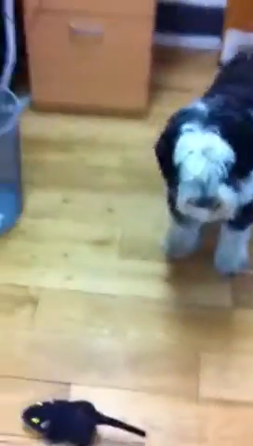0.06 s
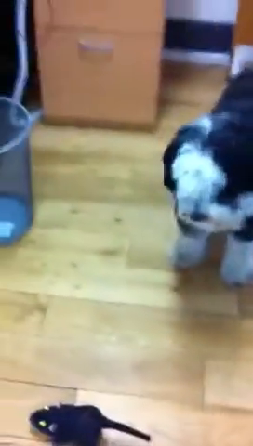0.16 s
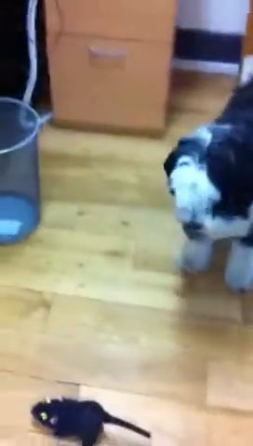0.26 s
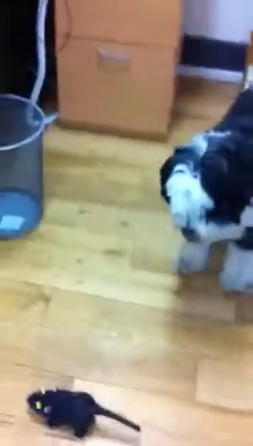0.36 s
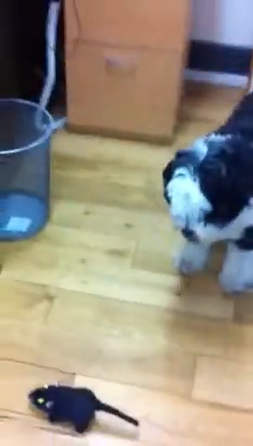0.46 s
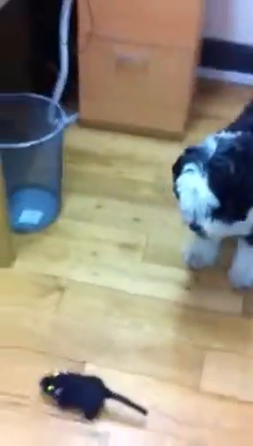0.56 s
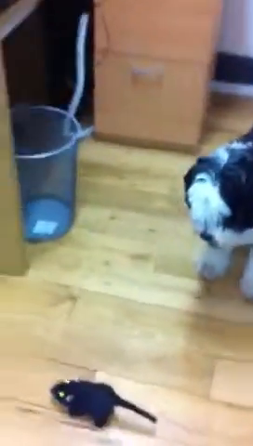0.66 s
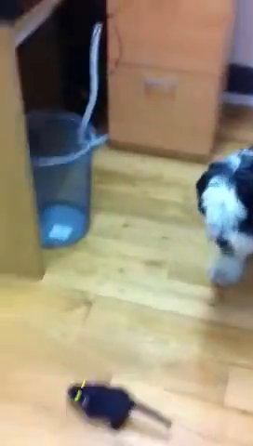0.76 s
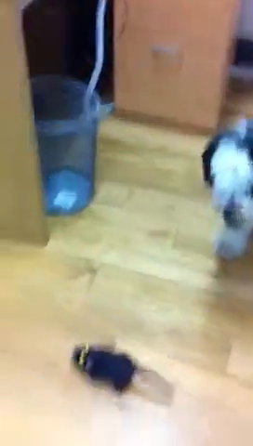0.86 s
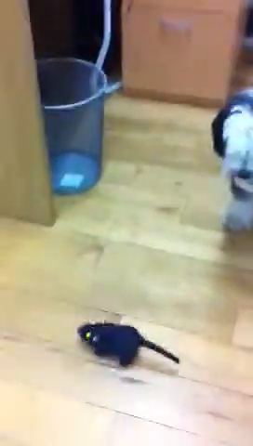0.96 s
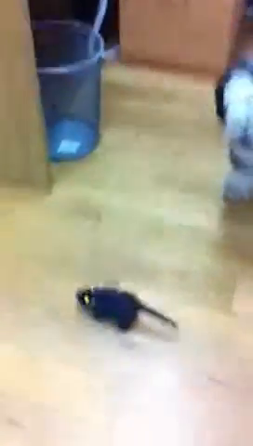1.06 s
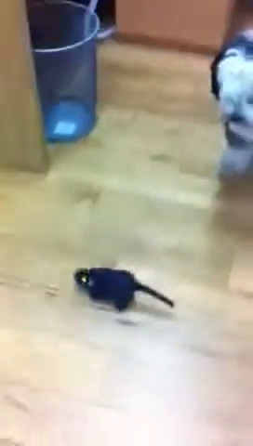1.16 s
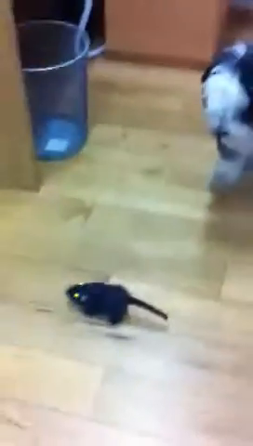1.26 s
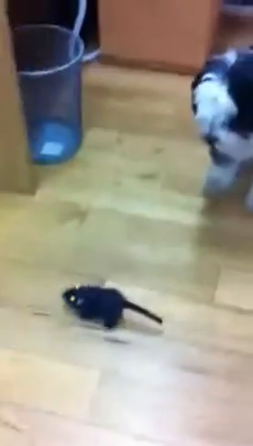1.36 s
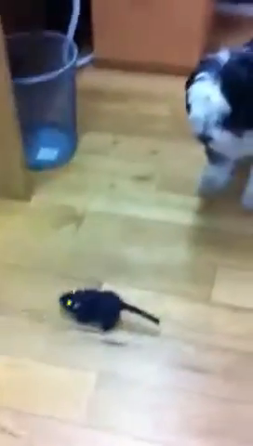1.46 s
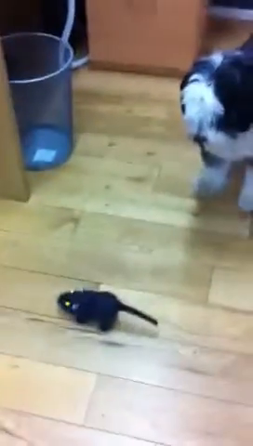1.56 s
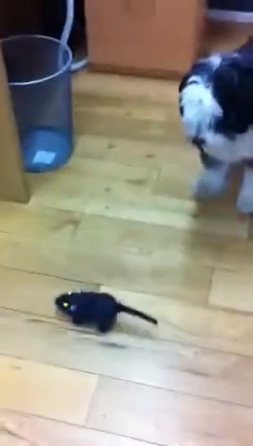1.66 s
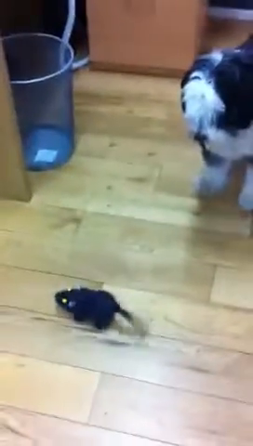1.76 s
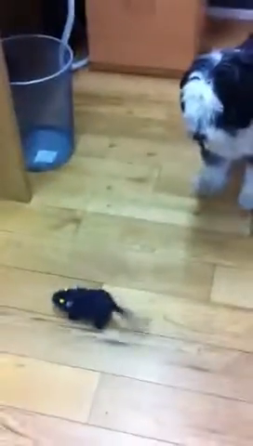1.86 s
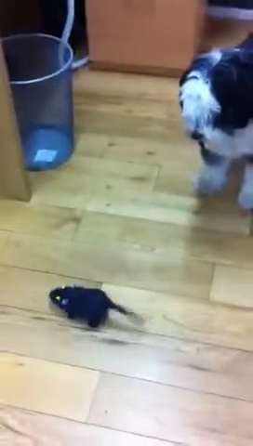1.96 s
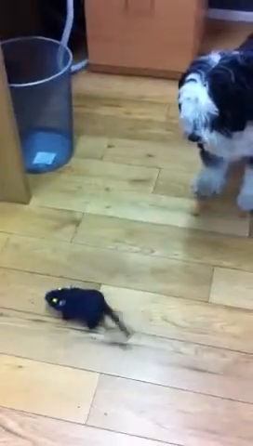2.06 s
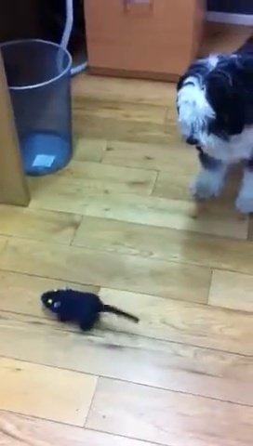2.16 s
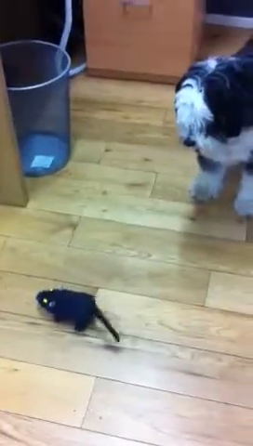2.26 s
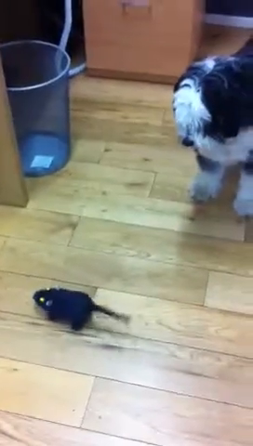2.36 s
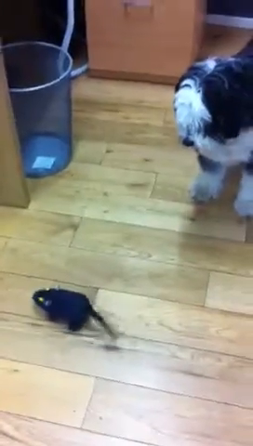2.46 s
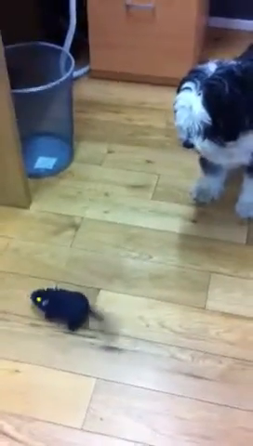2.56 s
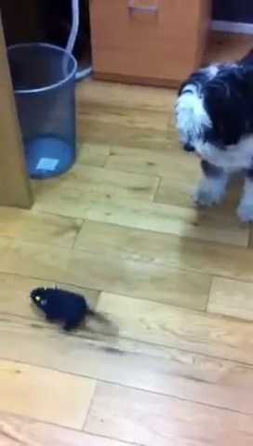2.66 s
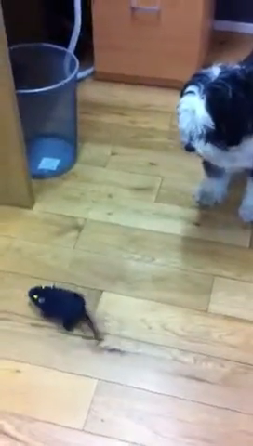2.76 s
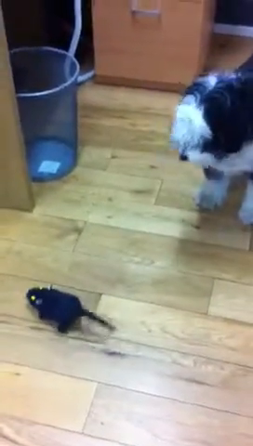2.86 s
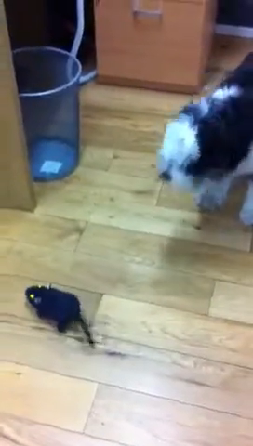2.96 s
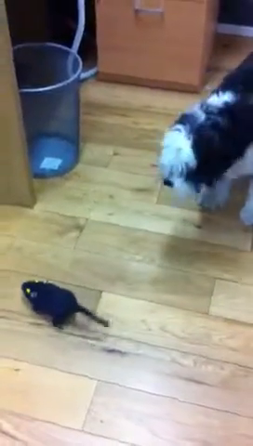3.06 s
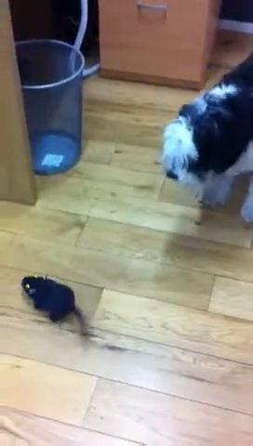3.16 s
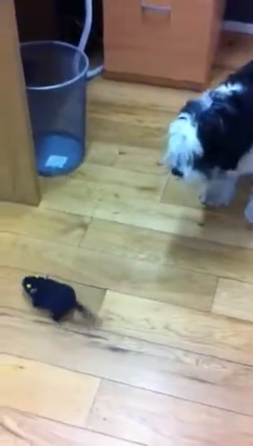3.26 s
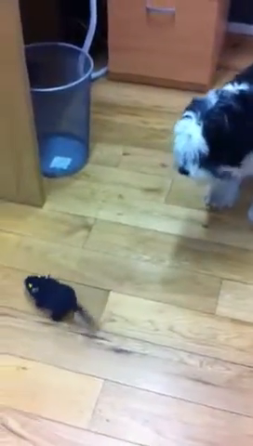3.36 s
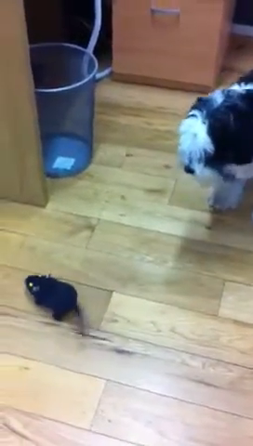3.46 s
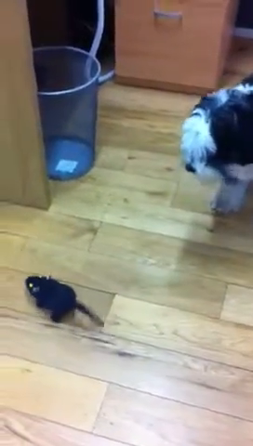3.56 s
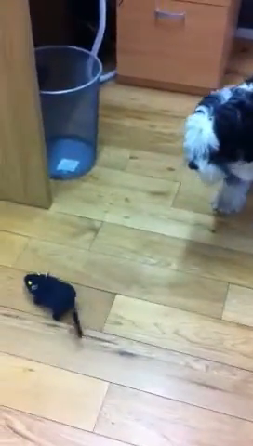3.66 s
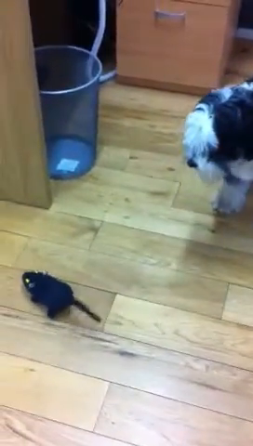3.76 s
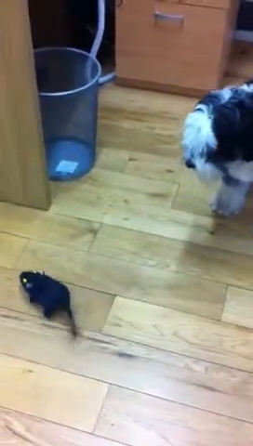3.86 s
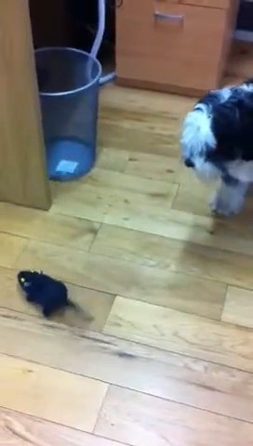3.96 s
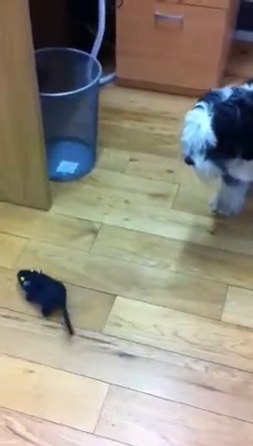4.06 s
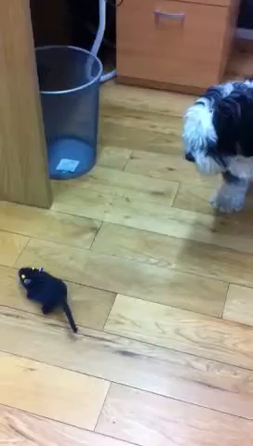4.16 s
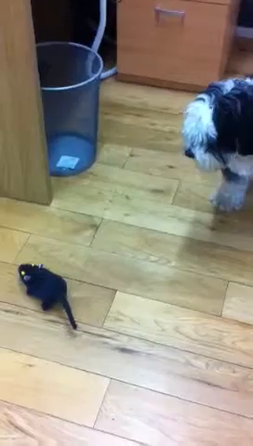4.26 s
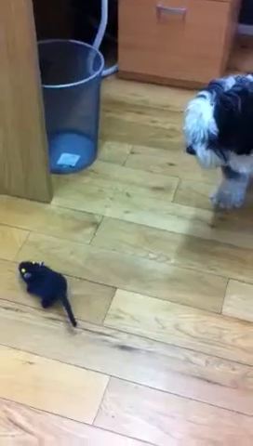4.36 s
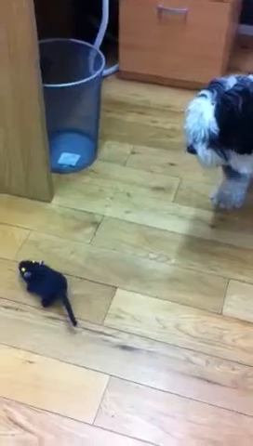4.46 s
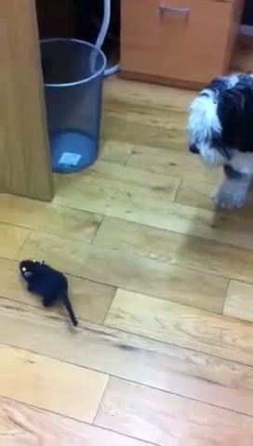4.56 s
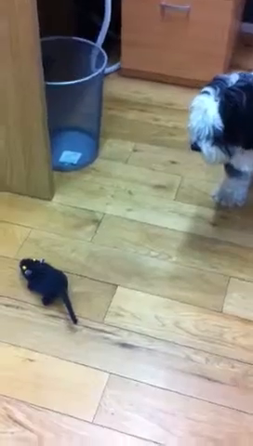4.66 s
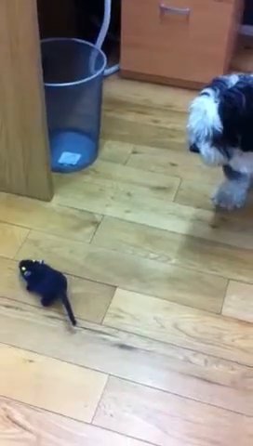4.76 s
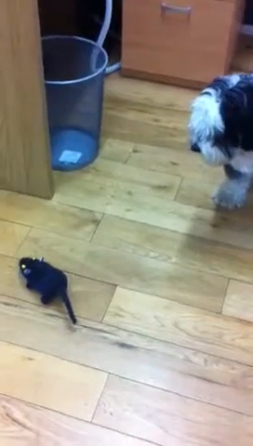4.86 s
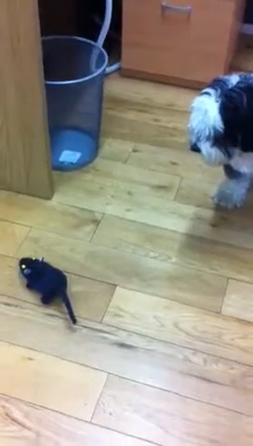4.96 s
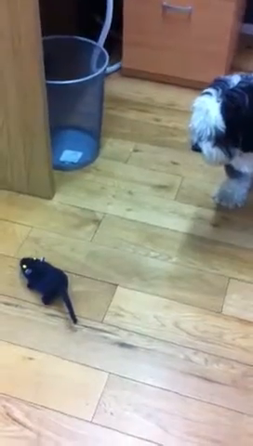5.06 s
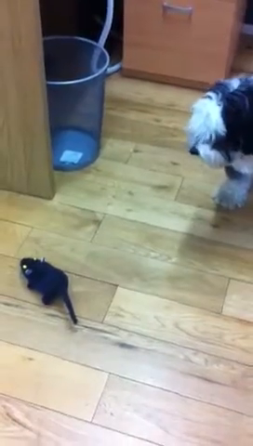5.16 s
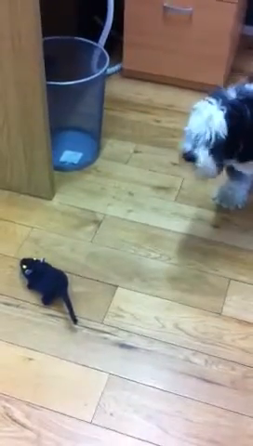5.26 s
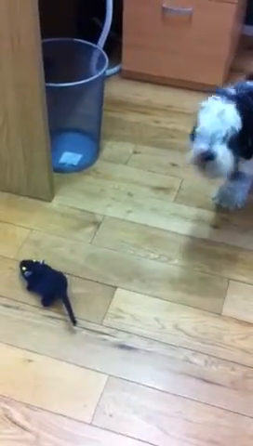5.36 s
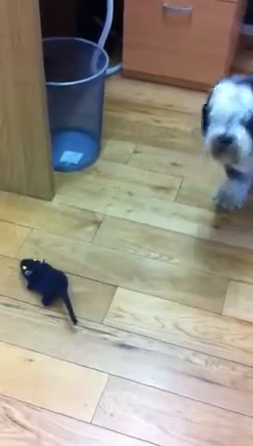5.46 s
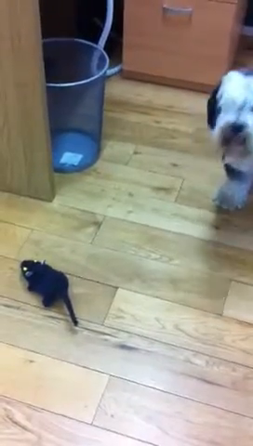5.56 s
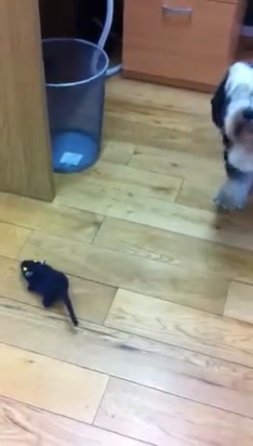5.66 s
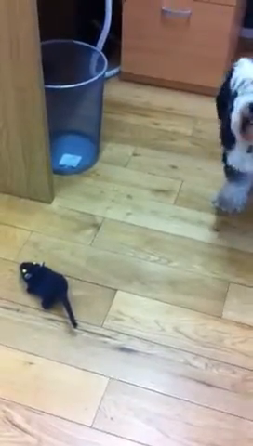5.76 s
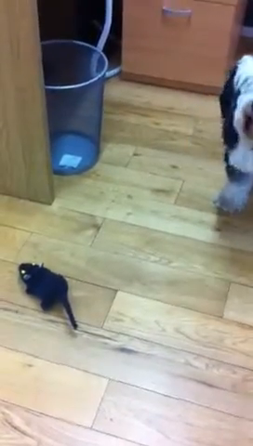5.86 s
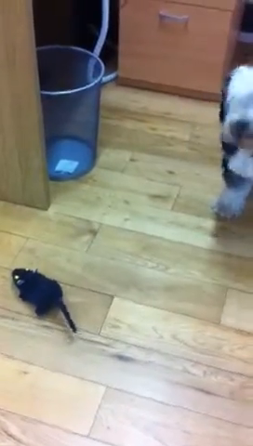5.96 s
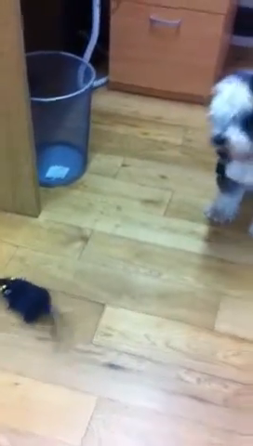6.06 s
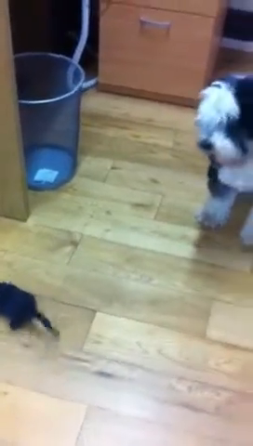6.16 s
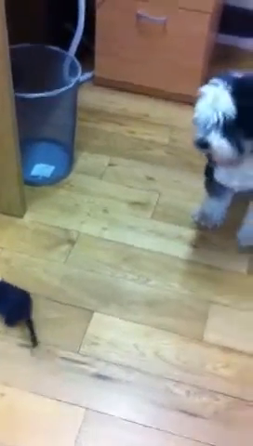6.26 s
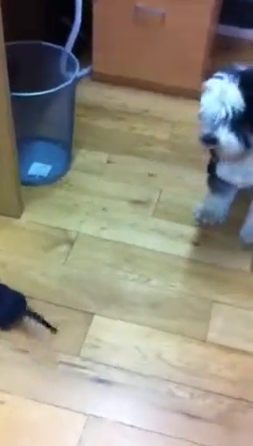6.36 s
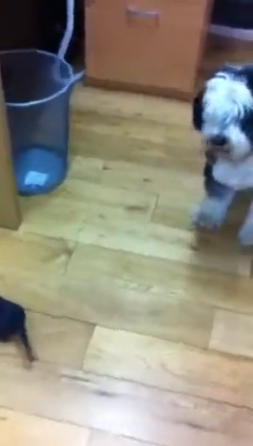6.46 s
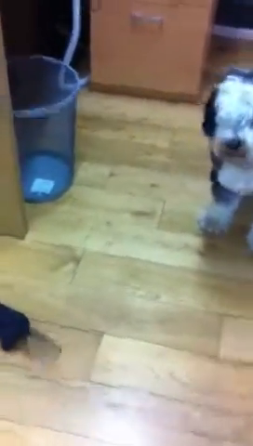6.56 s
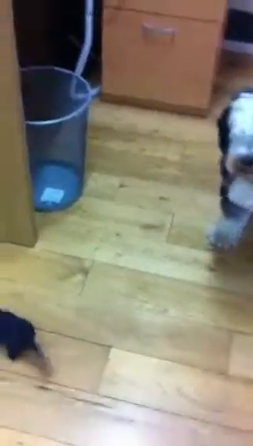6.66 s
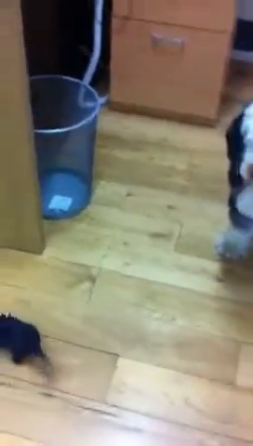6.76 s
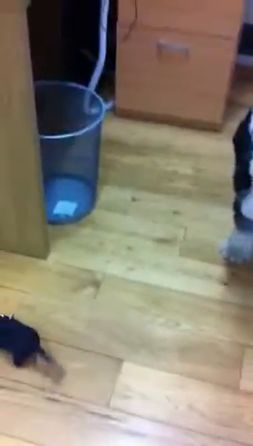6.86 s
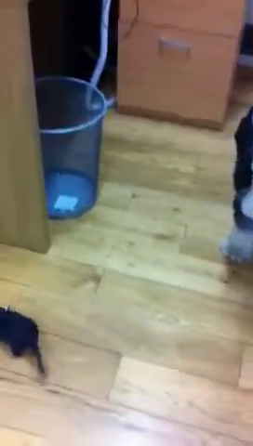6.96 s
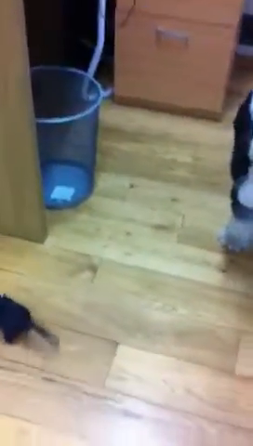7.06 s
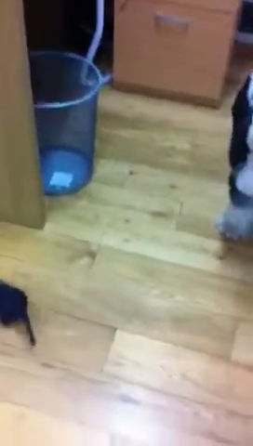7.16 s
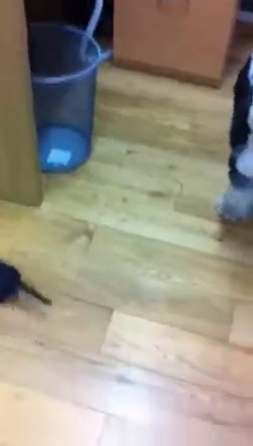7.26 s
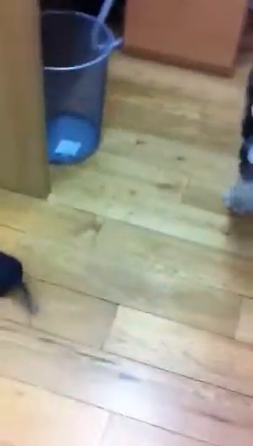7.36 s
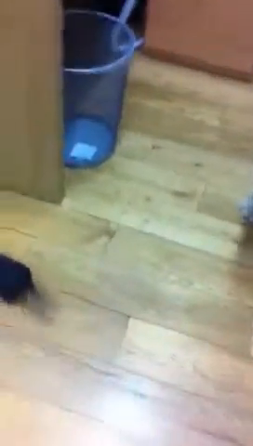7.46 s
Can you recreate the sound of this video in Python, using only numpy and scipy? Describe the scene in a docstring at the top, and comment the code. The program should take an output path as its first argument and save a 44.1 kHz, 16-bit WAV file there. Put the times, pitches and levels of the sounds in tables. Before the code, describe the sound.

A toy mouse whirrs and gives two runs of rapid high squeaks while a small dog barks twice in an echoing room.

```python
"""A motorised toy mouse squeaks and whirrs on a wooden floor, and a small dog barks at it twice.
The toy's gears rattle while a cam (a lopsided wheel) squeezes a bellows that blows a tiny whistle,
six times a second, in two runs. Paws thump on the boards, plastic clacks, and the bare room rings.
Each bark is a buzz of vocal folds and a rush of breath, shaped by the dog's throat.
An automatic volume control turns everything down at each bark, then slowly back up."""
import sys
import numpy as np
from scipy import signal
from scipy.fft import rfft, irfft
from scipy.io import wavfile
from scipy.ndimage import uniform_filter1d, minimum_filter1d

SR = 44100
rng = np.random.default_rng(int(sys.argv[2]) if len(sys.argv) > 2 else 0)


def unload_audio(sound):
    """Save the sound as a 16-bit wav file, at the path given as the first command line argument."""
    columns = np.transpose(np.atleast_2d(sound))
    # keep every value between -1 and 1, then stretch to whole-number steps
    steps = np.round(np.clip(columns, -1, 1) * 32767)
    wavfile.write(sys.argv[1], SR, steps.astype(np.int16))


N = 330750
TIME = np.arange(N) / SR

# The room's ring. Each row: frequency in Hz, seconds to fade by 60 dB.
ROOM_RING = [(150, 0.36), (500, 0.6), (1000, 0.53), (2000, 0.56), (4000, 0.62), (8000, 0.44), (15000, 0.36)]
# The room's low hush. Each row: frequency in Hz, relative level in dB.
HUSH_COLOUR = [(25, -19), (70, -17), (115, -11), (150, -0.5), (215, 1), (280, -5.5), (450, -14),
               (1000, -43), (4000, -35), (15000, -42.5)]
# The tone of the gear noise. Each row: frequency in Hz, relative level in dB.
GEAR_COLOUR = [(180, -47), (300, -16), (509, -16.5), (641, -14.5), (781, -8), (863, -13), (1590, -9),
               (1970, -4.5), (2100, -4.5), (2740, -12), (4490, -15.5), (5210, -18), (7620, -18),
               (10100, -18.5), (15500, -24.5)]
# Level of the toy's whirr, with a faint hiss swelling after the first bark.
# Each row: time in seconds, relative level in dB.
WHIRR_LEVELS = [(0, -49), (.8, -50), (2.8, -51.5), (3.6, -48), (6.3, -52), (7.5, -53.5)]
# The toy's knocks on the floor. Each row: start in seconds, relative level in dB.
CLACKS = [(2.351, -61), (2.572, -48), (2.640, -45), (2.700, -48.5), (6.184, -22.5), (6.191, -25)]
# The tone of one knock. Each row: frequency in Hz, relative level in dB.
CLACK_COLOUR = [(300, -47), (600, -33), (1150, -4.5), (2200, 0.5), (4000, -8.5), (6500, -16),
                (10000, -17.5), (15000, -22)]
# Paws landing. Each row: start in seconds, relative level in dB, slap level on top of that in dB,
# brightness of the boards' ring in dB per octave.
PAW_STEPS = [(0.261, -19, -14, 4.5), (2.148, -26.5, -11.5, 1.5), (2.938, -35, -4.5, -10),
             (4.100, -35, -6, -8.5), (5.848, -35, -0.5, 6.5), (6.461, -28.5, -29, -16.5)]
# The notes of the floorboards. Each row: frequency in Hz, relative level in dB, seconds to fade by 60 dB.
BOARD_NOTES = [(160, -18.5, 0.12), (213, -9.5, 0.068), (283, -3, 0.029), (372, -3.5, 0.027),
               (500, -8.5, 0.024), (596, -16, 0.036)]
# Runs of squeaks. Each row: start, stop, time per cam turn, time lost speeding up, delay of the last
# squeak (all in seconds), relative level in dB, fade in dB per second, brightness in dB per harmonic.
SQUEAK_RUNS = [(-.059, 2.0, .1642, 0, .003, -30.5, 1.34, -.5),
               (4.089, 6.15, .1636, .018, .009, -30.5, 1.2, -0.52)]
# The whistle's harmonics (multiples of its pitch). Each entry: relative level in dB, for harmonics 1 to 5.
WHISTLE_HARMONICS = [2.5, 3.5, -0.5, -1, -13.5]
# How squarely the toy faces the listener. Each row: time in seconds, gain of the direct treble in dB.
TOY_FACING = [(0, -2), (.7, -8), (1.4, -12), (1.9, -2.5), (4, -3.5), (6.1, -7.5)]
# Where the dog's throat rings. Each row: frequency in Hz, width in Hz, relative level in dB.
THROAT_RESONANCES = [(879, 255, 3), (1554, 170, 1), (2083, 460, -3.5), (2615, 280, -8.5),
                     (3243, 320, -13.5), (5430, 2830, -25.5), (8100, 6800, -35.5)]
# Where its chest booms. Each row: frequency in Hz, width in Hz, level at full effort in dB.
CHEST_RESONANCES = [(270.5, 150, -20), (506.3, 70, -19)]
# The barks. Each row: start in seconds, level in dB, top pitch in Hz, rise in seconds, hold in seconds,
# fade in dB per second, roughness from 0 to 1, mouth opening (above 1 raises the throat's resonances).
BARKS = [(2.996, -6, 507.7, 0.0059, .072, 19.5, 0.31, 1.079),
         (5.297, -3.5, 523, 0.018, .072, 114, 0.21, 1.016)]

GRUNT_S = .03  # a low grunt leads into each bark by this long


def amp(db):
    """Turns decibels into a number to multiply by."""
    return 10 ** (np.asarray(db) / 20)


def unit(x):
    """Scales a sound to an average (rms) level of 1."""
    return x / np.sqrt(np.mean(x ** 2) + 1e-20)


def value_at(points, hz):
    """Looks up a frequency between a table's rows, on an octave-like scale."""
    f, value = np.transpose(points)
    return np.interp(np.log(hz + 1), np.log(f + 1), value)


def add(mix, s, sound):
    """Mixes a sound in, starting at s seconds."""
    start = round(s * SR)
    sound = sound[max(-start, 0):]
    part = mix[max(start, 0):][:len(sound)]
    part += sound[:len(part)]


def colour(x, points):
    """Shapes a sound's tone from rows of Hz and dB, then scales it to level 1."""
    gains = amp(value_at(points, np.fft.rfftfreq(len(x), 1 / SR)))
    return unit(irfft(rfft(x) * gains, len(x)))


def wander(size, hz):
    """A random drift, mostly between -1 and 1, wiggling up to about hz times a second."""
    knots = rng.standard_normal(size // 8)
    return np.interp(np.arange(size) * 2 * hz / SR, np.arange(len(knots)), knots)


def resonate(x, hz, width):
    """Keeps the part of a sound near hz, which may glide; a smaller width rings longer."""
    turn = np.exp(2j * np.pi * np.cumsum(hz * np.ones(len(x))) / SR)
    r = np.exp(-np.pi * width / SR)
    return 2 * (turn * signal.lfilter([(1 - r) ** 2], [1, -2 * r, r * r], x / turn + 1e-18)).real


def snap(points, decay_s):
    """A small impact: a burst of shaped noise that dies quickly."""
    t = TIME[:4096]
    return colour(rng.standard_normal(len(t)), points) * np.exp(-t / decay_s)


def room(x, wet_db, build_s=0.0045):
    """Adds dense echoes off bare walls, at level wet_db; each frequency dies at its own speed."""
    spacing = 16  # samples per echo
    slots = np.arange(0, SR - spacing, spacing)
    echoes = np.zeros(SR)
    echoes[slots + rng.integers(0, spacing, len(slots))] = rng.choice([-1, 1], len(slots))
    hz, t, bands = signal.stft(echoes, SR, nperseg=256)
    fade = np.exp(-np.log(1000) * t / value_at(ROOM_RING, hz)[:, None])
    tail = signal.istft(bands * fade, SR, nperseg=256)[1][:SR]
    tail *= 1 - np.exp(-(TIME[:SR] / build_s) ** 2)
    return x + amp(wet_db) * signal.fftconvolve(x, tail / np.linalg.norm(tail))[:N]


def hush(level_db=-64):
    """The steady, low noise of the room."""
    return amp(level_db) * colour(rng.standard_normal(N), HUSH_COLOUR)


def motor_load(free_whine_hz=2150, free_whine_db=-69):
    """Pumping the bellows strains the motor: the whirr gets louder, the whine lower and softer."""
    pumping = sum(1.0 * ((TIME > start) & (TIME < stop)) for start, stop, *_ in SQUEAK_RUNS)
    load = uniform_filter1d(pumping, size=SR // 5)
    whirr_db = np.interp(TIME, *np.transpose(WHIRR_LEVELS)) + 1.13 * load
    return whirr_db, free_whine_hz - 56.5 * load, free_whine_db - 3 * load


def motor(grit=0.43, wobble=0.00448):
    """Gear teeth rattle in the shell, the motor whines, its brushes sizzle and the wheels drone."""
    whirr_db, whine_hz, whine_db = motor_load()
    teeth = rng.standard_normal(N) * np.exp(grit * rng.standard_normal(N) + 0.13 * wander(N, 60))
    gears = amp(whirr_db + 0.23 * wander(N, 3.9)) * colour(teeth, GEAR_COLOUR)
    wavering_hz = whine_hz * (1 + wobble * wander(N, 40))
    whine = amp(whine_db) * np.sin(2 * np.pi * np.cumsum(wavering_hz) / SR)
    wheel_db = np.interp(TIME, [1.7, 2.1], [-65, -80])  # loudest early on, as the toy drives off
    wheels = amp(wheel_db) * unit(resonate(rng.standard_normal(N), hz=216.7, width=5.8))
    shell = amp(whirr_db - 14) * unit(resonate(rng.standard_normal(N), hz=882, width=89))
    whine += amp(whine_db + 2.5) * unit(resonate(teeth, whine_hz, width=95))  # uneven teeth roughen it
    whine *= 1 + .5 * wander(N, 25)
    brushes = amp(whirr_db - 23) * unit(resonate(teeth, hz=10730, width=500))
    return gears + shell + wheels + brushes + room(whine, wet_db=2)


def cam_strokes():
    """The cam turns evenly, slower as it starts and stops. Gives each squeak's time, level, brightness."""
    rows = []
    for start, stop, turn_s, spin_up_s, coast_s, db, fade_db_per_s, bright_db in SQUEAK_RUNS:
        times = np.arange(start, stop, turn_s)
        times += spin_up_s * (1 - np.exp(-np.arange(len(times))))
        times[-1] += coast_s
        rows += [(s, db - fade_db_per_s * (s - start), bright_db) for s in times]
    return rows


def cam_ticks(delay_s=.072, level_db=-44):
    """After each squeak the bellows drop off the cam with a soft tick."""
    out = np.zeros(N)
    tick_colour = [(400, -22), (850, 10), (1250, 12.5), (2200, -1), (4000, 1.5), (14000, -50)]
    for s, *_ in cam_strokes():
        tick = snap(tick_colour, decay_s=0.015)
        start = s + delay_s + .002 * rng.standard_normal()
        add(out, start, amp(level_db + rng.standard_normal()) * tick)
    return room(out, wet_db=-3)


def clacks(gain_db=-2):
    """The toy's plastic shell and tail knock on the floor."""
    out = np.zeros(N)
    for s, db in CLACKS:
        add(out, s, amp(db + gain_db) * snap(CLACK_COLOUR, decay_s=0.0048))
    return room(out, wet_db=3)


def paws(thump_gain_db=-4, contact_s=0.00039):
    """Each footfall makes the boards ring, with a slap of pad and claw."""
    out, t = np.zeros(N), TIME[:SR // 4]
    slap_colour = [(200, -20), (700, -4.5), (1800, -9), (5000, -14.5), (14000, -40)]
    for s, db, slap_db, tilt_db in PAW_STEPS:
        ring = np.zeros(len(t))
        for hz, note_db, ring_s in BOARD_NOTES:
            loudness = amp(note_db + tilt_db * np.log2(hz / 300)) * np.exp(-np.log(1000) * t / ring_s)
            ring += loudness * np.sin(2 * np.pi * (hz * t + rng.random()))
        add(out, s, amp(db + thump_gain_db) * ring * (1 - np.exp(-t / contact_s)))
        add(out, s, amp(db + slap_db) * snap(slap_colour, decay_s=0.0044))
    return room(out, wet_db=-0.5)


def squeak(top_hz, rise_s, bright_db, fall_s=0.022, bend=.26, waver=0.0074, swell=0.69):
    """One squeeze of the bellows: pitch and loudness rise and fall with the air pressure."""
    t = np.arange(-rise_s, fall_s, 1 / SR)
    pressure = np.maximum(1 - np.where(t < 0, t / rise_s, t / fall_s) ** 2, 0)
    # the air jet is steadiest at full pressure and raspy below it
    rasp = waver * wander(SR // 8, 934)[:len(t)] * (2 - 1.13 * pressure ** 2)
    hz = top_hz * (1 - bend * (1 - pressure)) * (1 + rasp)
    phase = 2 * np.pi * np.cumsum(hz) / SR
    tone = np.zeros(len(t))
    for k, db in enumerate(WHISTLE_HARMONICS):
        strength = pressure ** (.15 + .05 * k ** 3)  # high harmonics need the most pressure
        tone += amp(db + bright_db * k) * strength * np.sin((k + 1) * phase)
    return tone * (1 - swell + swell * pressure ** 4)


def whistle(pitch_hz=3051, spread_hz=8.1, peak_delay_s=.003, gain_db=-1, beam_hz=6000):
    """The squeaks fill the room; only their treble is beamed straight ahead."""
    out = np.zeros(N)
    lead_s = .1  # spare time for the squeak that comes just before time zero
    for s, db, bright_db in cam_strokes():
        sharp, slow = rng.standard_normal(2)
        rise_s = .009 * np.exp(.08 * slow)
        sound = squeak(pitch_hz + spread_hz * sharp, rise_s, bright_db)
        add(out, lead_s + s + peak_delay_s - rise_s, amp(db + gain_db) * sound)
    treble = signal.lfilter(*signal.butter(1, beam_hz, "high", fs=SR), out + 1e-18)
    beam = amp(np.interp(TIME - lead_s, *np.transpose(TOY_FACING))) * treble
    echoes = room(out, wet_db=-2.5, build_s=0.0035) - out
    lead = round(lead_s * SR)
    return np.pad((beam + echoes)[lead:], (0, lead))


def bark_shape(db, top_hz, rise_s, hold_s, fade_db_per_s, top_rough, opening):
    """From a low grunt, the voice leaps up and brightens as the vocal folds tighten, holds, then drops."""
    tighten_s, release_s = .041, .067
    slack_hz, grunt_hz_per_s = 279.7, 2600
    t = np.arange(-GRUNT_S, hold_s + release_s, 1 / SR)
    grunt = np.clip(-t / rise_s, 0, 1)
    loose = 1 - np.clip(t / tighten_s, 0, 1)
    release = np.clip((t - hold_s) / release_s, 0, 1)
    tension = (1 - loose ** 2) * np.cos(np.pi / 2 * release)
    slack = 1 - tension
    hz = top_hz * tension + slack_hz * slack + grunt_hz_per_s * np.minimum(t, 0)
    hz *= 1 + .01 * wander(SR, 45.2)[:len(t)]  # a slight quaver
    effort_db = db - 24.5 * grunt - 10 * slack - fade_db_per_s * np.maximum(t, 0) - 15.5 * release ** 2
    rough = np.clip(top_rough * tension + 0.29 * slack, 0, 1)
    mouth = opening * (tension + 0.82 * slack)
    tilt_db = -6 * loose  # per octave: the voice starts dark
    return effort_db, hz, rough, mouth, tilt_db


def bark(effort_db, hz, rough, mouth, tilt_db, jitter=0.035, nose_hz=3943, nose_width_hz=600):
    """Uneven pulses of the vocal folds and puffs of breath pass a throat that opens and shuts."""
    cycles = np.cumsum(hz * (1 + jitter * rough * wander(SR, 250)[:len(hz)])) / SR
    folds = unit(sum(np.cos(2 * np.pi * k * cycles) for k in range(1, 8)))
    puffs = unit((0.22 + np.exp(-(cycles % 1) / 0.236)) * rng.standard_normal(SR)[:len(hz)])
    buzz = (1 - rough) * folds + 3.84 * (rough + 0.13) * puffs
    lowest = THROAT_RESONANCES[0][0]
    voice = np.zeros(len(hz))
    for f, width, db in THROAT_RESONANCES:
        moved_hz = f * mouth ** (lowest / f)  # the jaw moves the lowest resonance most
        voice += amp(db + tilt_db * np.log2(f / lowest)) * resonate(buzz, moved_hz, width)
    # the nose swallows one band, and a small mouth gives out little bass
    voice = signal.lfilter(*signal.iirnotch(nose_hz, nose_hz / nose_width_hz, SR), voice)
    voice = signal.sosfilt(signal.butter(3, 570, "high", fs=SR, output="sos"), voice)
    # the chest booms as the pitch sweeps through its resonances
    low_tone = amp(0.33 * effort_db) * np.sin(2 * np.pi * cycles)
    chest = sum(amp(db) * resonate(low_tone, f, width) for f, width, db in CHEST_RESONANCES)
    return (amp(effort_db) * unit(voice) + chest) * signal.windows.tukey(len(hz), .05)


def dog():
    """Two barks and their ring in the room."""
    out = np.zeros(N)
    for s, *settings in BARKS:
        add(out, s - GRUNT_S, bark(*bark_shape(*settings)))
    return room(out, wet_db=-1)


def scene(low_cut_hz=135):
    """Dog and toy, their deep bass thinned by the microphone, over the hush of the room."""
    sources = dog() + whistle() + cam_ticks() + clacks() + paws() + motor()
    low_cut = signal.butter(3, low_cut_hz, "high", fs=SR, output="sos")
    return (signal.sosfilt(low_cut, sources) + hush())[None]


def record(dry, ceiling_db=-3, recover_db_per_s=4.5, top_hz=15800):
    """The volume drops at peaks over the ceiling and creeps back; then the highest treble is cut."""
    peaks = -minimum_filter1d(-abs(dry[0]), size=130)
    over_db = np.maximum(20 * np.log10(peaks + 1e-9) - ceiling_db, 0)
    recovery = TIME * recover_db_per_s
    drop_db = np.maximum.accumulate(over_db + recovery) - recovery
    turned_down = dry / amp(uniform_filter1d(drop_db, size=130))
    treble_cut = signal.firwin(511, top_hz, window=("kaiser", 9), fs=SR)
    return signal.oaconvolve(turned_down, treble_cut[None], "same")


dry = scene()
out = record(dry)
unload_audio(out)
```